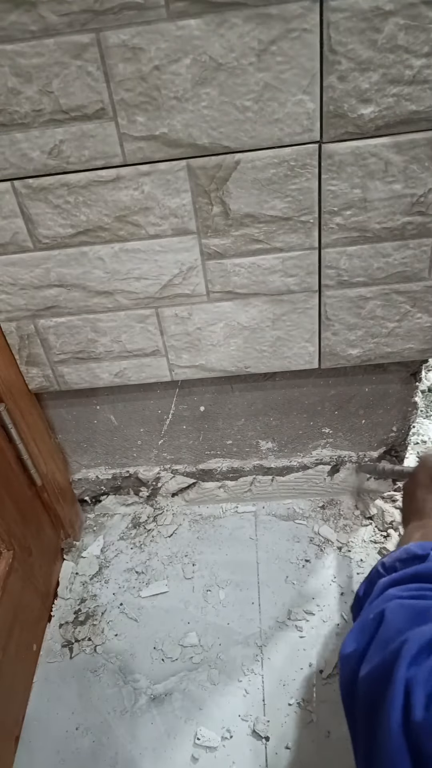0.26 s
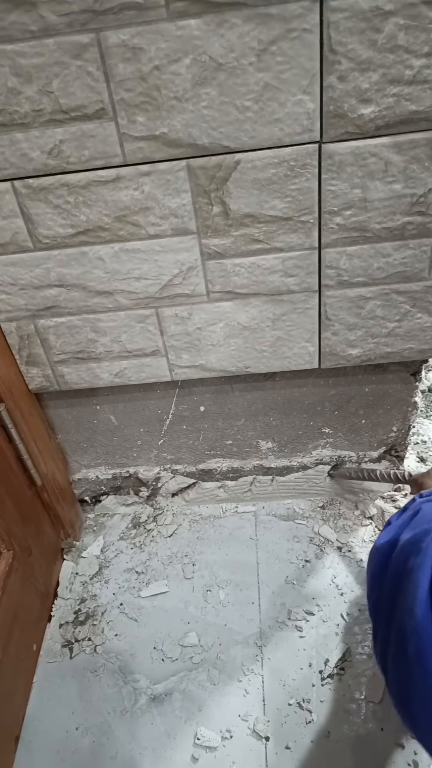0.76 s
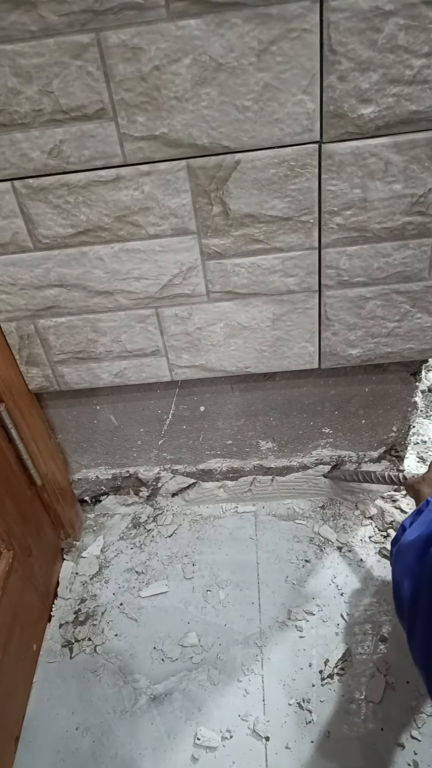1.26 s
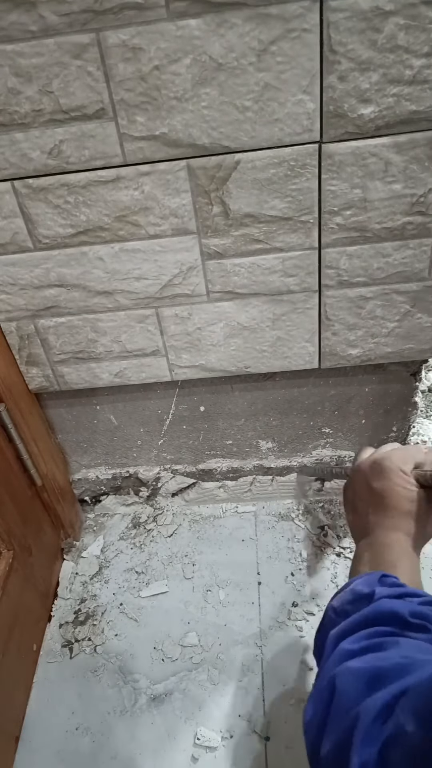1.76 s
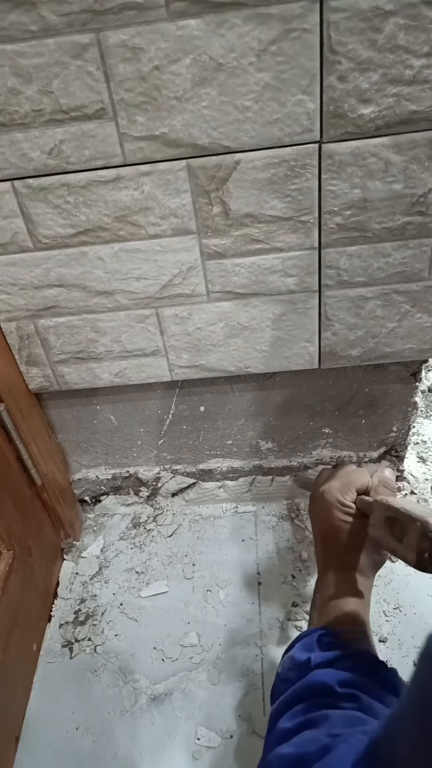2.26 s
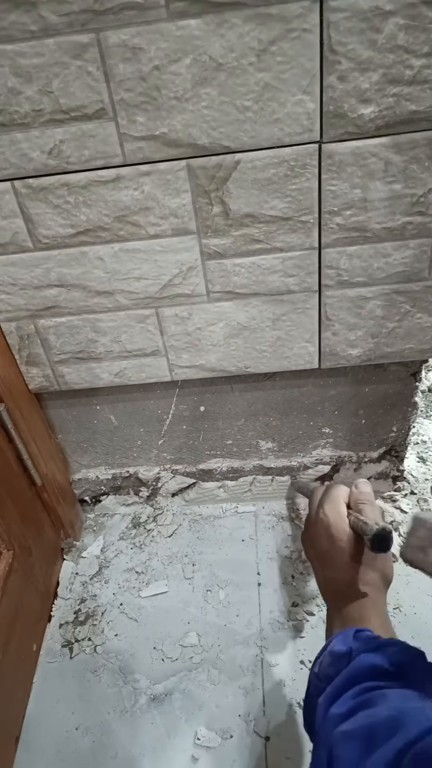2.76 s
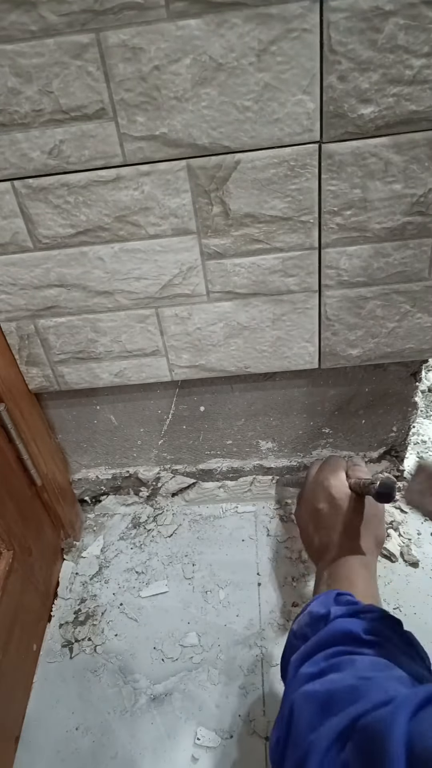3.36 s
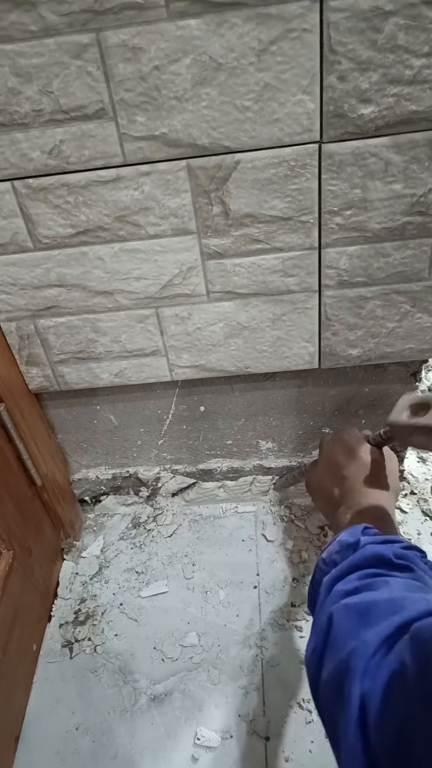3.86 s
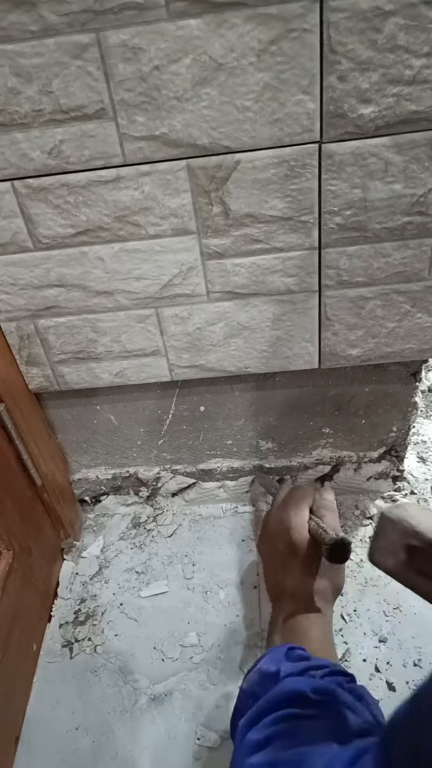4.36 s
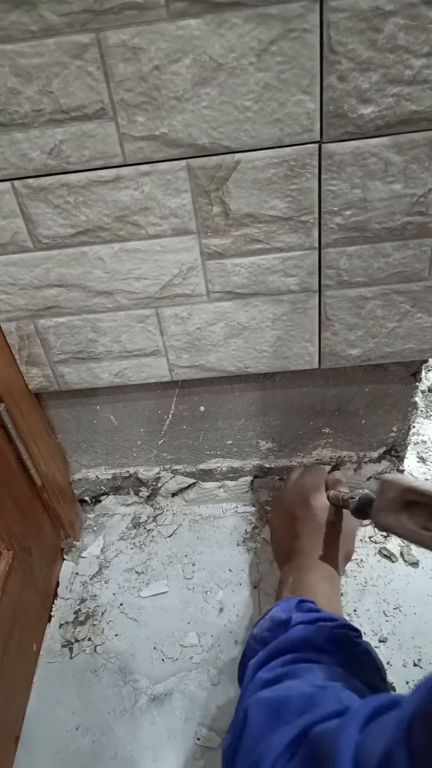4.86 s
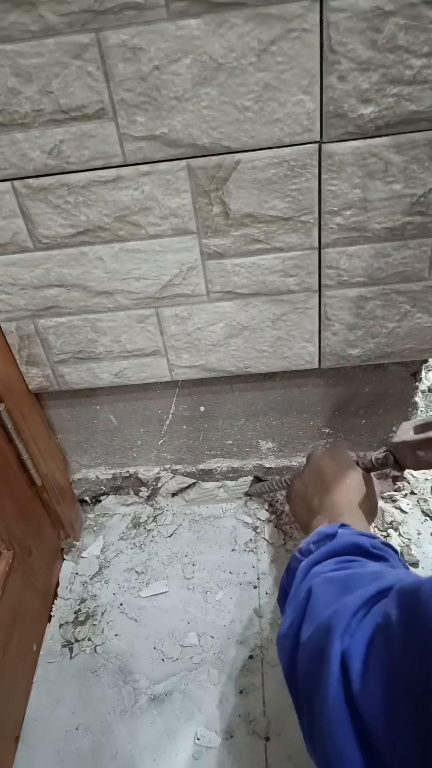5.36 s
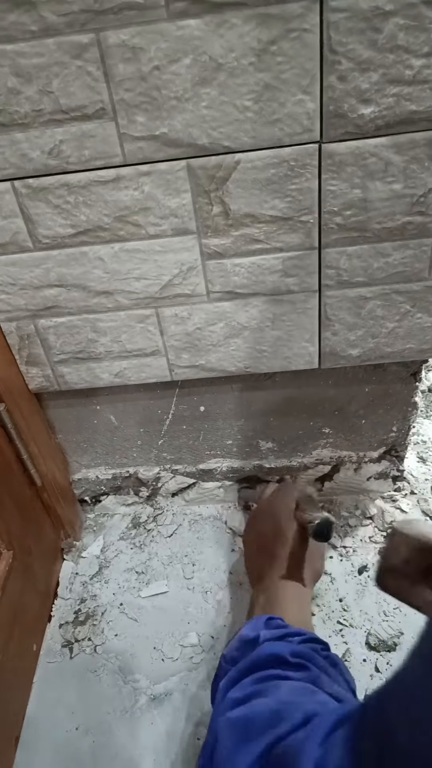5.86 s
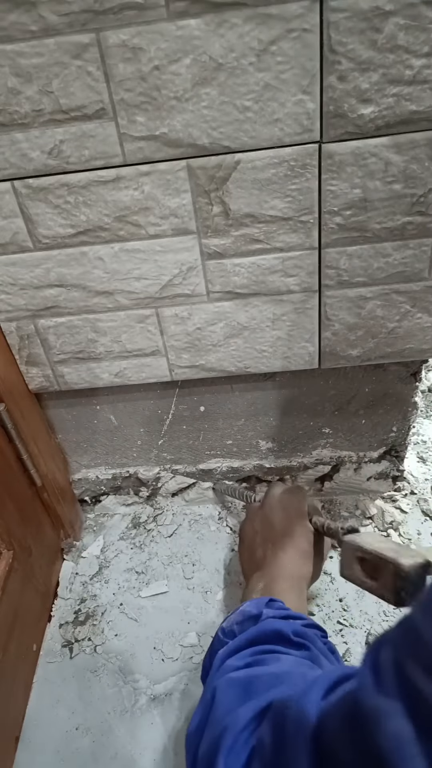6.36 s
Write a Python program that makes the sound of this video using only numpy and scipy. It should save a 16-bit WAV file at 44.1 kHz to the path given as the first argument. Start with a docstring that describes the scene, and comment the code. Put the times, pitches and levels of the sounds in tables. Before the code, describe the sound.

Quick runs of hard steel-on-steel strikes, about ten a second, crack tile and spray fine grit as a hammer drives a chisel. The runs break off for brief gaps with a few single blows, small clinks, falling chips and soft thuds, then start again. A bare tiled room rings briefly after each hit, and a few low knocks bump the nearby microphone over a faint hiss.

```python
"""A bare tiled room, at the foot of a wall: a club hammer drives a steel bar chisel into tile and mortar.
The blows come in quick bursts. Each snaps steel on steel, cracks the tile, sprays grit, thumps the wall
and sets the bar ringing, and the room answers. In the pauses the tip is set down again, chips fall and
the floor gives dull thuds. A few low knocks reach the microphone, over a faint bed of rumble and hiss."""
import sys
import numpy as np
from scipy import signal
from scipy.io import wavfile

SR = 44100
rng = np.random.default_rng(int(sys.argv[2]) if len(sys.argv) > 2 else 0)


def wrap_up_sound(samples):
    """Save the sound to the file named by the first command line argument, as 16-bit audio."""
    columns = np.atleast_2d(samples).T
    # keep every value between -1 and 1, then stretch to whole-number steps
    tamed = np.clip(columns, -1, 1)
    steps = np.round(tamed * 32767).astype(np.int16)
    wavfile.write(sys.argv[1], SR, steps)


N = 291501

# Modes of the steel bar (three bends, one lengthwise mode, four overtones):
# f/Hz, width/Hz, base t60/s of the chatter on the mortar, gain/dB, left minus right/dB
BAR_MODES = [(2180, 146, 0.14, 3.5, 0), (4200, 197, 0.17, 3.5, 4), (6454, 240, 0.19, -1, 6.5),
             (8413, 64, 0.12, 2.5, -12), (9710, 230, 0.25, -4.5, -13.5), (11350, 100, 0.17, -1.5, 5),
             (12760, 300, 0.21, -1.5, -1.5), (14470, 190, 0.19, -1, .5)]


def amp(db):
    return 10 ** (np.asarray(db) / 20)


def rms_one(x):
    return x / np.sqrt(np.mean(x ** 2) + 1e-20)


def at_hz(curve, hz):
    """Read a curve of (f/Hz, value) points along a log frequency axis."""
    points_hz, values = np.transpose(curve)
    return np.interp(np.log(hz), np.log(points_hz), values)


def band(x, low_hz, high_hz):
    return signal.sosfilt(signal.butter(2, [low_hz, high_hz], "band", fs=SR, output="sos"), x)


def resonance(x, hz, width_hz):
    """Two-pole resonator with unity gain at its peak."""
    r = np.exp(-np.pi * width_hz / SR)
    feedback = [1, -2 * r * np.cos(2 * np.pi * hz / SR), r * r]
    return signal.lfilter(np.array([1, 0, -1]) * (1 - r * r) / 2, feedback, x)


def decay(t60, rise_s, size):
    """Percussive envelope: a short rise, then 60 dB lost in t60 seconds."""
    t = np.arange(size) / SR
    return (1 - np.exp(-t / rise_s)) * amp(-60 * t / t60)


def pan(left_minus_right_db):
    return amp(np.array([[0.5], [-0.5]]) * left_minus_right_db)


def add(out, start_s, sound):
    at = round(start_s * SR)
    out[..., at:at + sound.shape[-1]] += sound[..., :N - at]


def diffuse_noise(gain, size):
    """Half-octave noise bands, centred in the bass and wide above, each shaped by gain(hz)."""
    # How alike the two channels are: f/Hz, correlation
    likeness = [(60, 1), (130, 1), (290, 0.87), (640, 0.13), (1410, -0.15), (3100, 0.16), (6820, 0.083),
                (15000, -0.45)]
    edges_hz = 25 * 2 ** np.arange(0, 9.6, .5)
    out, white = 0, rng.standard_normal((2, 2, size))
    for k, (low, high) in enumerate(zip(edges_hz, edges_hz[1:])):
        centre_hz = np.sqrt(low * high)
        mid, side = band(white[k % 2], low, high)
        alike = at_hz(likeness, centre_hz)
        out += gain(centre_hz) * (np.sqrt(1 + alike) * mid + np.sqrt(1 - alike) * side * [[1], [-1]])
    return out


def room_tone():
    """A steady bed of low rumble with a thin hiss."""
    # Colour of the bed: f/Hz, relative level/dB
    spectrum = [(15, -34), (25, 7.5), (264, 6), (833, -44), (1810, -26), (2020, -18), (3260, -41),
                (4150, -8.5), (7280, -38.5), (11000, -30), (15000, -33)]
    return amp(-56) * rms_one(diffuse_noise(lambda hz: amp(at_hz(spectrum, hz)), N))


def room_reverb(send):
    """Diffuse echoes off bare tile: a noise tail that dies band by band, new on every call."""
    # Decay of the room: f/Hz, t60/s
    decay_times = [(100, 0.28), (260, 0.94), (700, 0.86), (1840, 0.67), (4850, 0.49), (8400, 0.32),
                   (12800, 0.39)]
    # Colour of the tail: f/Hz, relative level/dB
    colour = [(60, 7), (250, -0.5), (1000, -2.5), (3000, 0), (7000, 0), (15000, -10.5)]
    size = SR * 3 // 4
    tail = diffuse_noise(
        lambda hz: amp(at_hz(colour, hz)) * decay(at_hz(decay_times, hz), 0.00094, size), size)
    return amp(-29) * signal.fftconvolve(send[None], tail, axes=1)[:, :N]


def microphone_knocks():
    """Knocks felt by the microphone itself: single low pressure pulses, stronger on the right."""
    # Pressure pulses: t/s, level before filter and pan/dB, length/s
    pulses = [(0.399, -34, 0.0049), (2.28, -56, 0.011), (3.02, -34.5, 0.0068), (4.845, -27, 0.0098),
              (5.208, -40, 0.012), (6.181, -37, 0.0024)]
    out = np.zeros(N)
    for start_s, db, length_s in pulses:
        add(out, start_s, amp(db) * np.hanning(round(length_s * SR)))
    return signal.sosfilt(signal.butter(2, 22, "high", fs=SR, output="sos"), out) * pan(-7)


def floor_thuds():
    """Soft weight on the floor: a rounded attack into one low resonance."""
    # Dull thuds: t/s, level/dB, f/Hz, t60/s
    thuds = [(1.64, -36, 99, 0.24), (1.683, -32, 98, 0.094), (1.741, -37.5, 124, 0.09),
             (2.567, -28, 100, 0.06), (4.078, -32, 128, 0.05), (5.92, -50, 109, 0.35)]
    out, size = np.zeros(N), SR // 2
    t = np.arange(size) / SR
    for start_s, db, hz, t60 in thuds:
        add(out, start_s, amp(db) * np.sin(2 * np.pi * hz * t) * decay(t60, 0.0042, size))
    return out


def wall_thump(noise, levels_db, t60):
    """Wall and floor slab answer a push with broad low resonances, one for each level given."""
    # Resonances (two thumps, hollow knock, deep body): f/Hz, width/Hz, gain/dB
    wall_modes = [(233, 89, 5), (319, 108, 1.5), (450, 89, 1.5), (92, 200, 4)]
    out, push = 0, noise * decay(t60, 0.0077, len(noise))
    for (hz, width_hz, gain_db), level_db in zip(wall_modes, levels_db):
        body = resonance(push, hz, width_hz)
        out += amp(level_db + gain_db) * body / np.abs(body).max()
    return out


def bar_ring(levels_db, pitches_hz, t60_scale, size):
    """A hit kicks each given mode, then the tip chatters on the mortar and keeps it ringing roughly."""
    out, noise = 0, rng.standard_normal((len(BAR_MODES), 2, size))
    for mode, level_db, hz, chatter in zip(BAR_MODES, levels_db, pitches_hz, noise):
        _, width_hz, t60, gain_db, pan_db = mode
        ring_samples = SR / (np.pi * width_hz)
        drive = amp(-2.5) * np.sqrt(ring_samples) * chatter * decay(t60 * t60_scale, 0.00072, size)
        drive[:, 0] += ring_samples / 2 * np.sign(chatter[:, 0])   # the kick
        ring = resonance(drive, hz, width_hz)
        ring = resonance(ring, hz, 10.7 * width_hz)   # keeps the gaps between modes dark
        out += amp(level_db + gain_db) * pan(pan_db) * ring
    return out


def light_touches():
    """The tip set down, chips dropping: a tick, a small thump and a hand-damped clink of the bar."""
    # Light contacts: t/s, tick/dB, thump/dB, clink/dB
    touches = [(1.529, -34, -49, -49), (1.6579, -51, -51, -48), (1.8144, -46, -66, -61),
               (2.0695, -38, -69, -51), (2.6262, -76, -55, -58), (2.671, -62, -77, -55.5),
               (2.884, -47, -38.5, -52), (4.0777, -43, -43, -40.5), (4.1, -49, -49, -65),
               (4.348, -61, -55, -60), (5.5897, -38, -46.5, -50), (5.7028, -44, -52, -48.5),
               (5.764, -58, -57, -72), (5.9077, -23, -45.5, -62), (5.9287, -30, -50, -47),
               (6.019, -42, -70, -54), (6.0652, -24, -62, -50)]
    # Bends of the loosely held bar: f/Hz
    resting_hz = [2060, 3900, 6630]
    out, size = np.zeros((2, N)), SR // 8
    for start_s, tick_db, thump_db, clink_db in touches:
        noise = rng.standard_normal((3, size))
        burst = noise[:2] * decay(0.078, 0.00099, size)
        tick = amp(tick_db) * band(band(burst, 600, 4900), 600, 4900)
        clink = bar_ring([clink_db] * 3, resting_hz, t60_scale=0.53, size=size)
        thump = wall_thump(noise[2], [thump_db] * 3, t60=0.025)
        add(out, start_s, tick + clink + thump)
    return out


def tile_crack(noise, crack_db, snap_db, treble_db):
    """Steel snaps on steel, the tile breaks and rings, and fine grit sprays after a high tick."""
    size = noise.shape[-1]
    # A hard blow breaks the tile cleanly; weaker cracks crumble on for longer.
    hard_db, hard_t60, db_per_doubling = -11, 0.022, 5
    t60 = min(hard_t60 * 2 ** ((hard_db - crack_db) / db_per_doubling), 0.22)
    fracture = noise[:3] * decay(t60, 0.029 * t60, size)
    crunch = amp(crack_db) * band(fracture[0], 980, 4070)
    bright_db = crack_db - 5 + 0.36 * (snap_db - crack_db)   # brighter where steel meets steel squarely
    edge = amp(bright_db) * band(fracture[1], 2500, 7660)
    loose_tile = amp(crack_db - 0.5) * resonance(fracture[2], hz=1410, width_hz=324)
    push = band(np.abs(noise[3]) * decay(0.003, 0.0001, size), 2020, 6050)
    snap = amp(snap_db) * push / np.abs(push).max(axis=1, keepdims=True)
    soften = signal.butter(4, 8200, fs=SR, output="sos")
    crack = signal.sosfilt(soften, crunch + edge + loose_tile + snap)
    burst = noise[1] * decay(0.011, 0.00052, size)
    tick = amp(treble_db + 17.5) * band(band(burst, 7800, 12000), 7800, 14000)
    grit = amp(treble_db - 9.5) * band(noise[0] * decay(0.28, 0.003, size), 8400, 12000)
    return crack + tick + grit


def hammer_blows():
    """Each blow layers crack, bar ring and wall thump; returns the stereo hits and mono reverb sends."""
    # Blows, with base layer levels: t/s, crack/dB, snap/dB, wall thump/dB, hollow knock/dB, two lower
    # bends/dB, high bend/dB, lengthwise mode/dB, treble (overtones, tick, grit)/dB, reverb send/dB
    blows = [(0.001, -38, -19.5, -42, -43, -34.5, -56, -48, -53, -2.5),
             (0.082, -11, -15, -37, -38.5, -34.5, -52, -42.5, -49.5, -5.5),
             (0.288, -15, -12, -32.5, -38, -31, -34, -32, -50, -8),
             (0.398, -19.5, -33, -44, -37.5, -34, -36, -25, -60, -1.5),
             (0.705, -29, -24, -39, -30.5, -38, -33, -39, -59, -3.5),
             (0.806, -6.5, -7.5, -35.5, -32.5, -31.5, -41, -42, -49, -7.5),
             (0.894, -13, -12, -35.5, -31, -33, -31, -38.5, -47, -5.5),
             (0.991, -8, -13.5, -43.5, -34, -40, -34.5, -42, -46, -3.5),
             (1.082, -23, -23.5, -45.5, -40.5, -37, -39, -46.5, -48.5, 0.5),
             (1.177, -20, -19, -45.5, -36.5, -35, -56, -55, -48.5, -2.5),
             (1.258, -21, -22, -44.5, -37, -37, -46, -49, -52, -0.5),
             (1.353, -19, -22, -46.5, -51, -41, -38, -36, -50, -1.5),
             (1.448, -11.5, -24, -46.5, -41, -35.5, -34.5, -43, -48.5, -2.5),
             (1.919, -18, -28.5, -48.5, -47, -39, -37, -28.5, -63, 0),
             (2.146, -14, -34, -42, -43.5, -32, -31.5, -34.5, -76, -4.5),
             (2.266, -9, -14, -44.5, -34, -30, -34, -33, -49.5, -4),
             (2.367, -6, -12.5, -46.5, -47, -27, -27, -27, -53, -5),
             (2.756, -5, -27, -37, -37, -24, -35, -31, -44.5, -10),
             (2.958, -5.5, -64, -37.5, -65, -40, -65, -41.5, -53.5, -7.5),
             (3.052, -10.5, -15, -35.5, -32, -36, -40, -45, -44.5, -5.5),
             (3.155, -17, -22, -42, -51, -38, -46, -32, -52, -0.5),
             (3.255, -12, -16.5, -42, -39, -45, -46, -31.5, -52, -2.5),
             (3.352, -19, -16, -53, -44, -37.5, -38, -38, -48, -2),
             (3.436, -11, -9, -43.5, -36, -29.5, -34, -34, -41.5, -6),
             (3.522, -11.5, -10, -43, -39.5, -33.5, -45, -35, -49, -4.5),
             (3.608, -22, -18, -49.5, -36, -33.5, -35.5, -44, -46, -1.7),
             (3.698, -20, -14, -65, -32, -35.5, -35, -44.5, -49, -2),
             (3.78, -14.5, -16, -48, -33, -41, -37, -47, -50, -2),
             (3.856, -20.5, -26, -63, -44, -35, -37.5, -56, -51, 2),
             (3.946, -6, -15, -49, -43, -24, -24, -40.5, -46, -9),
             (4.217, -5.5, -68, -37.5, -35, -31.5, -32, -48.5, -66, -9),
             (4.468, -8, -13, -35.5, -37, -33, -34.5, -39, -47, -8),
             (4.571, -13.5, -20.5, -42.5, -35, -39.5, -40, -35.5, -50.5, -0.5),
             (4.667, -15.5, -22, -47.5, -33.5, -42, -57, -35.5, -51, .4),
             (4.759, -14, -15.5, -48, -34, -33, -37, -36.5, -49, -2.5),
             (4.846, -22, -24, -43.5, -40, -37.5, -41, -27, -49, -1.3),
             (4.936, -5, -18, -45, -39, -40.5, -34, -45, -50, -2.5),
             (5.032, -15.5, -21, -41.5, -37.5, -38, -39, -36, -47.5, -4.5),
             (5.127, -24, -12.5, -46, -37.5, -42, -41, -38, -44.5, -2.5),
             (5.214, -28.5, -17, -47, -40, -52, -34, -32.5, -52, -1.5),
             (5.298, -12, -27, -46, -52, -36, -34, -30, -50, -0.7),
             (5.383, -14, -24, -53, -47, -35, -27, -39, -52, -2),
             (5.47, -18, -12.5, -43.5, -43, -40, -35, -38, -49, -3.5),
             (5.825, -12.5, -37, -42, -51, -46, -64, -37, -53.5, -2.5),
             (6.077, -9, -22, -46, -38.5, -48, -62, -42, -49.5, -2.5),
             (6.175, -16.5, -15, -40.5, -33.5, -37.5, -56, -27, -47, -3),
             (6.268, -13, -24, -41, -39.5, -57, -57, -34.5, -49, 1.8),
             (6.364, -19.5, -17.5, -44.5, -30, -47, -35, -26, -45, -1.3),
             (6.465, -18, -17, -40, -34.5, -50, -56, -34.5, -53, 1),
             (6.56, -22, -20, -36, -33, -42.5, -43, -28, -54, -3.5)]
    # The hand shifts along the bar and changes its ring:
    # t/s, middle bend f/Hz, low bend offset/dB, top overtone offset/dB
    grip = [(0, 4150, -1, -12), (.3, 4270, 4, -10), (.4, 4260, 3, 14), (.9, 4500, -7, 6),
            (1.35, 4450, -14, -3), (1.9, 3830, -8, 12), (2.4, 4040, 0.5, 14), (2.75, 4180, -1, -12),
            (3.2, 4350, -9, 5), (3.5, 4300, 2, -5), (3.85, 4520, -8, -3), (3.94, 4030, -10, -9),
            (4.25, 4100, -2.5, -25), (4.45, 4280, 1.5, -15), (4.65, 4450, -5, 4), (4.95, 4300, 4.5, -10),
            (5.3, 4330, -5, 7), (5.85, 4020, 6, -5), (6.2, 4100, -10, 6), (6.6, 4030, 6, 4)]
    grip_s, *grip_curves = np.transpose(grip)
    pitch_spread, overtone_spread_db, deep_spread_db, pan_spread_db = 0.01, 5, 1.5, 2.5
    send_count, size = 6, SR // 4
    direct, sends = np.zeros((2, N)), np.zeros((send_count, N))
    for k, (start_s, crack_db, snap_db, thump_db, knock_db, *bar_db, send_db) in enumerate(blows):
        bends_db, high_bend_db, lengthwise_db, treble_db = bar_db
        noise, chance = rng.standard_normal((4, 2, size)), rng.standard_normal(10)
        crack = tile_crack(noise, crack_db, snap_db, treble_db)

        middle_hz, low_db, top_db = (np.interp(start_s, grip_s, curve) for curve in grip_curves)
        pitches_hz = np.array(BAR_MODES)[:, 0]
        pitches_hz[1] = middle_hz
        pitches_hz[:3] *= 1 + pitch_spread * chance[:3]
        overtones_db = treble_db + overtone_spread_db * chance[4:8]
        overtones_db[-1] += top_db
        levels_db = [bends_db + low_db, bends_db, high_bend_db, lengthwise_db, *overtones_db]
        ring = bar_ring(levels_db, pitches_hz, t60_scale=0.8, size=size)

        deep_db = -49.5 + deep_spread_db * chance[8]
        thump = wall_thump(noise[2, 0], [thump_db, thump_db, knock_db, deep_db], t60=0.1)
        hit = crack + ring + thump
        add(direct, start_s, pan(pan_spread_db * chance[9]) * hit)
        add(sends[k % send_count], start_s, amp(send_db) * hit.mean(axis=0))
    return direct, sends


def scene():
    """Blows up front, small sounds in the pauses, reverb and room tone behind."""
    blows, sends = hammer_blows()
    touches, thuds, bed = light_touches(), floor_thuds(), room_tone()
    # Arms and tool move, so the echoes change from blow to blow: each send has its own tail.
    blow_echoes = sum(room_reverb(send) for send in sends)
    soft_echoes = room_reverb(amp(-11.5) * touches.mean(axis=0) + amp(-4) * thuds)
    return bed + soft_echoes + blow_echoes + microphone_knocks() + thuds + touches + blows


def record(dry):
    """Each microphone port rolls off its bass; peaks are rounded and the top is cut steeply."""
    # Bass roll-off, left port then right: f/Hz
    bass_cuts_hz = [70.4, 9.9]
    ports = np.array([signal.lfilter(*signal.butter(1, hz, "high", fs=SR), channel)
                      for hz, channel in zip(bass_cuts_hz, dry)])
    ceiling = 0.7
    rounded = ceiling * np.tanh(ports / ceiling)
    return signal.sosfilt(signal.cheby2(12, 70, 16500, fs=SR, output="sos"), rounded)


dry = scene()
out = record(dry)
wrap_up_sound(out)
```